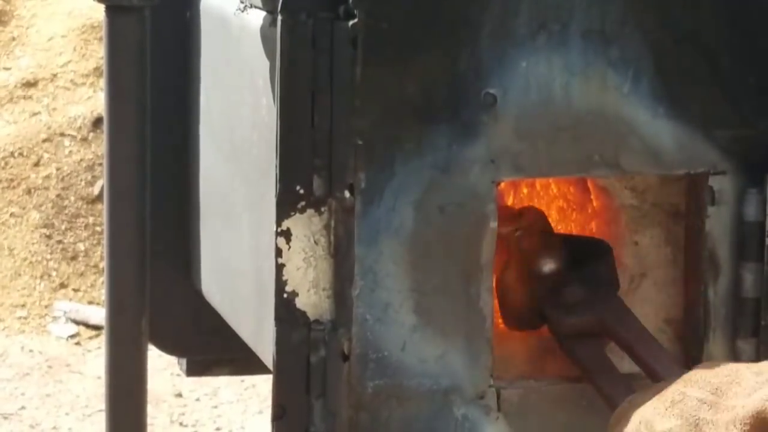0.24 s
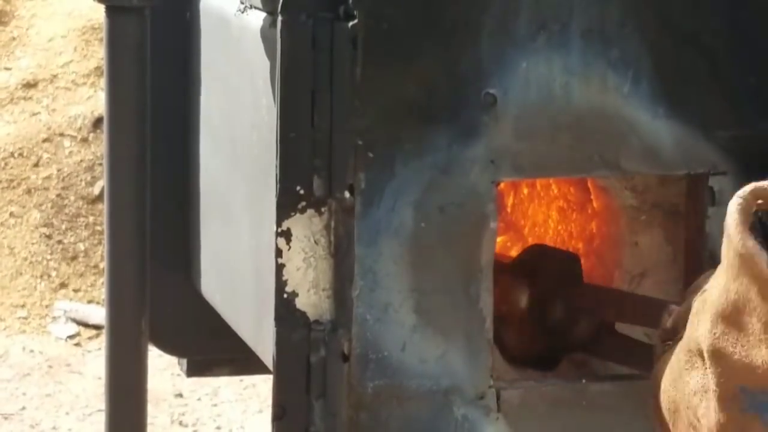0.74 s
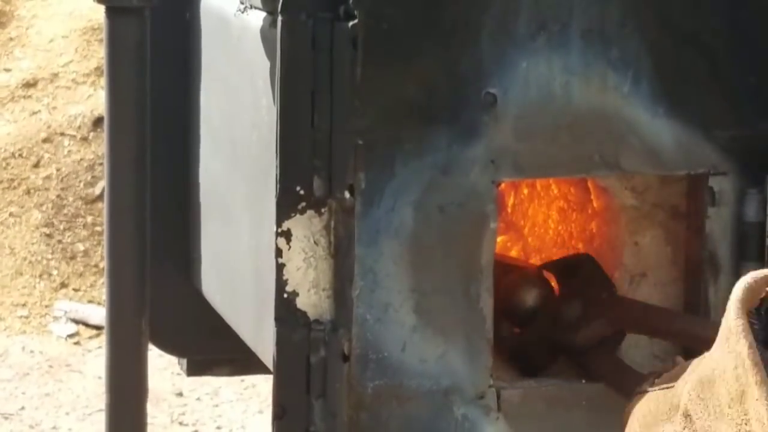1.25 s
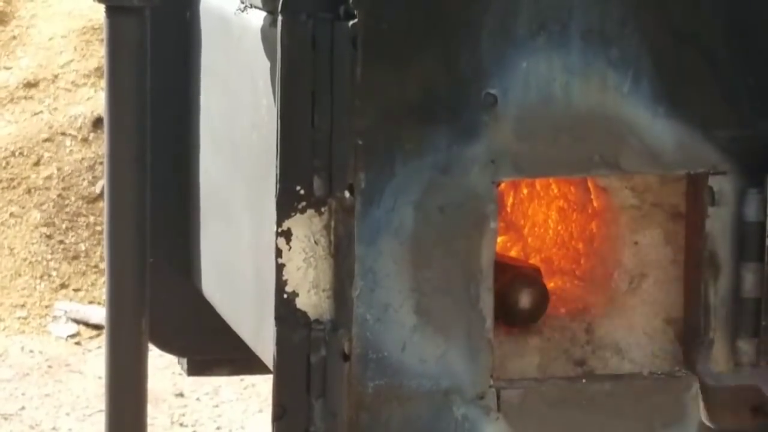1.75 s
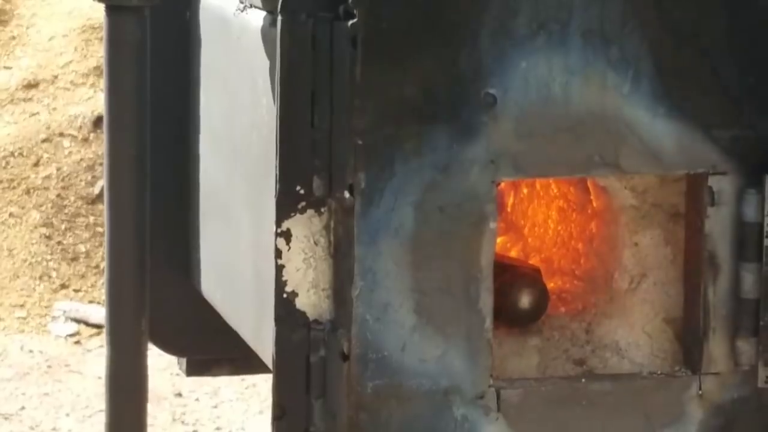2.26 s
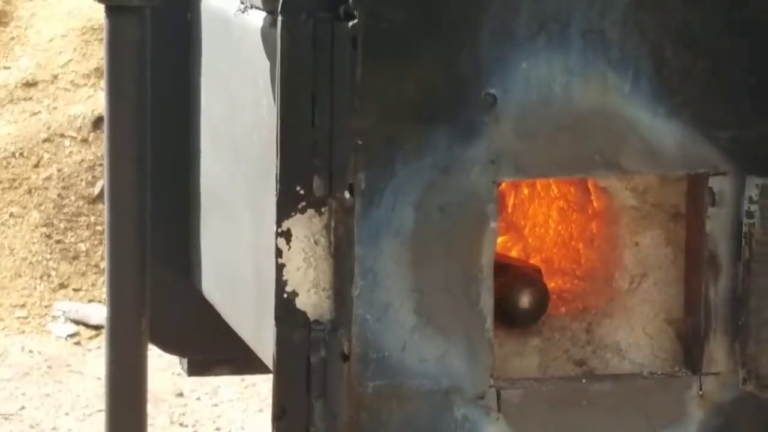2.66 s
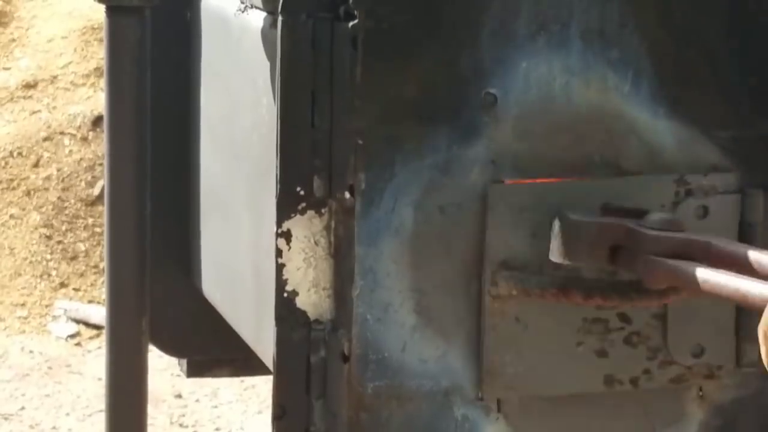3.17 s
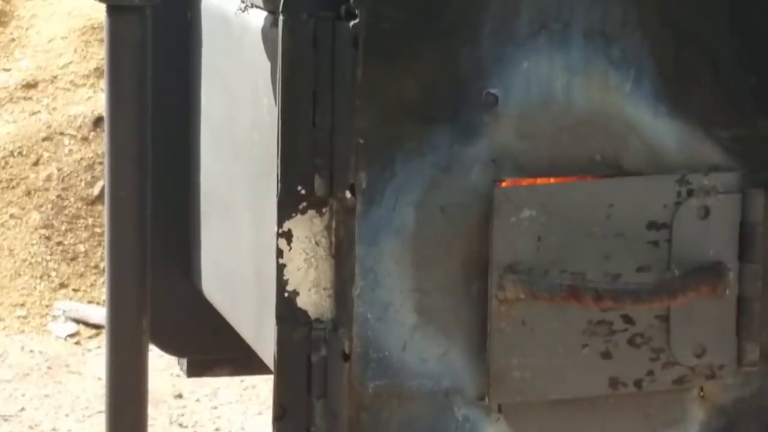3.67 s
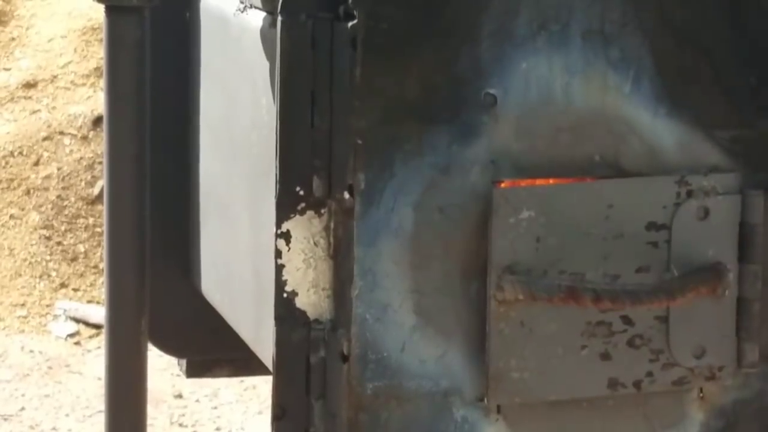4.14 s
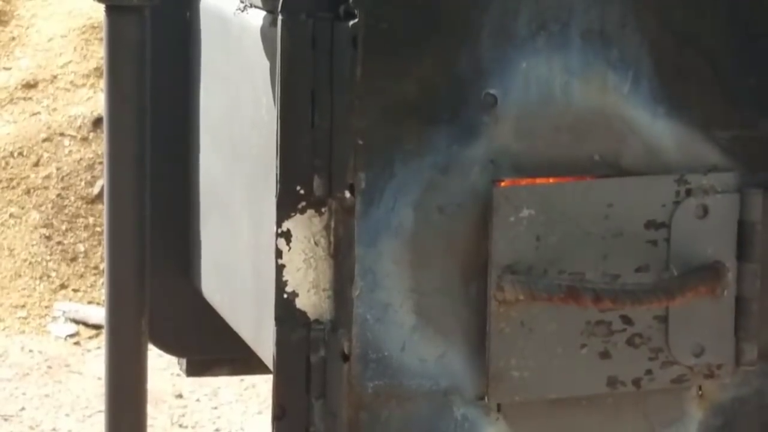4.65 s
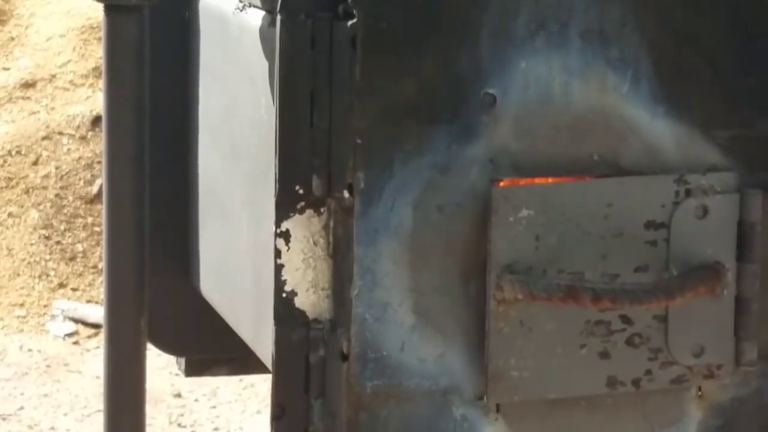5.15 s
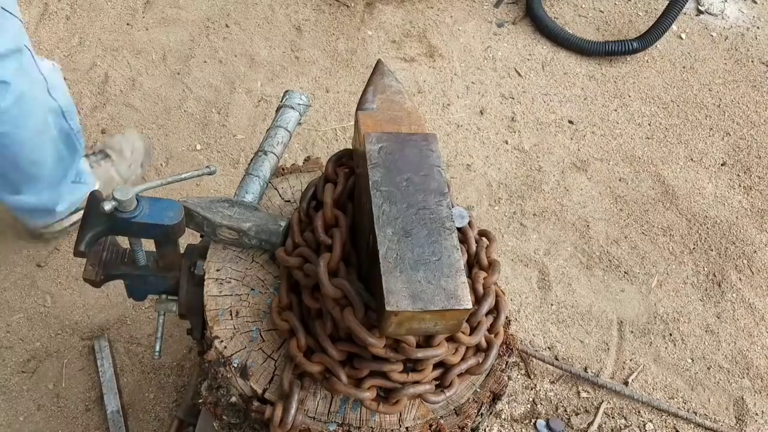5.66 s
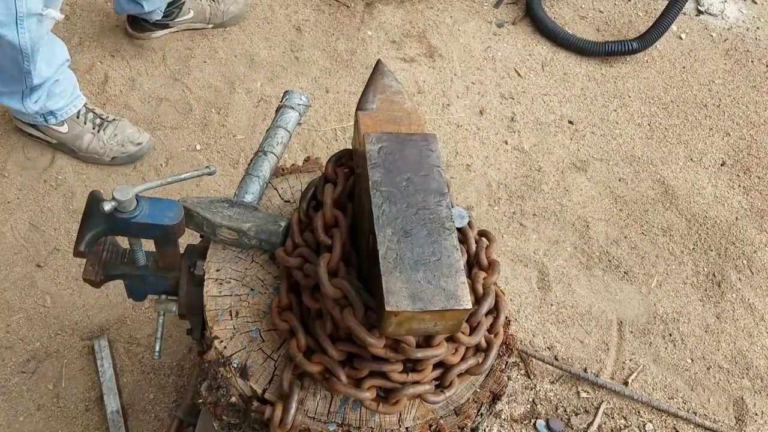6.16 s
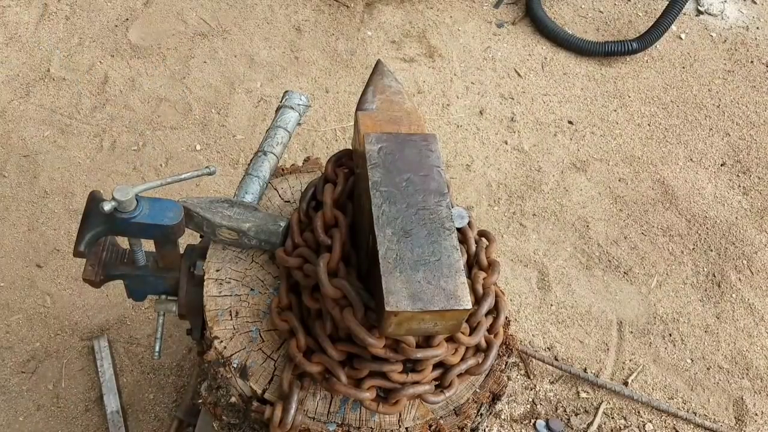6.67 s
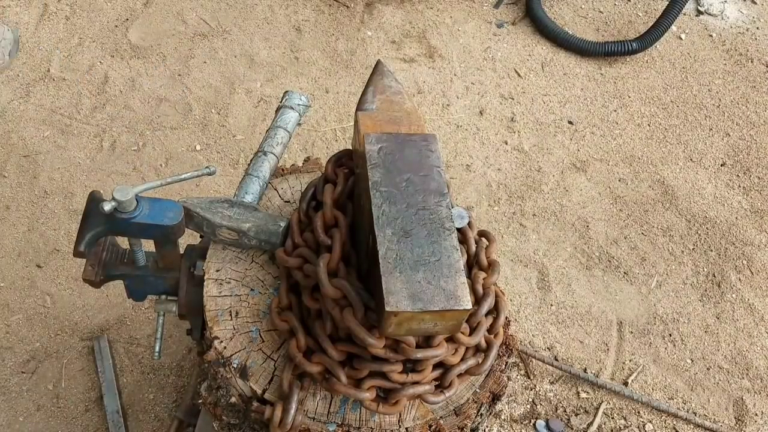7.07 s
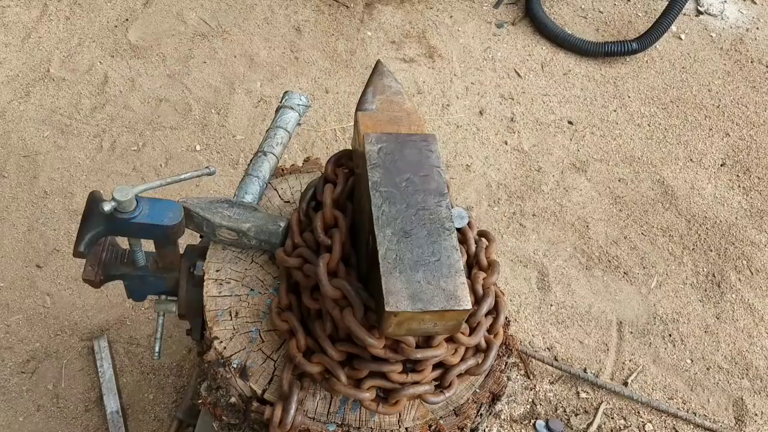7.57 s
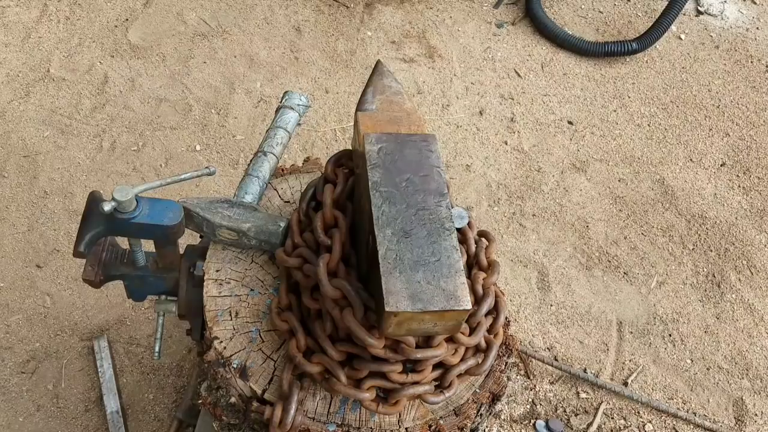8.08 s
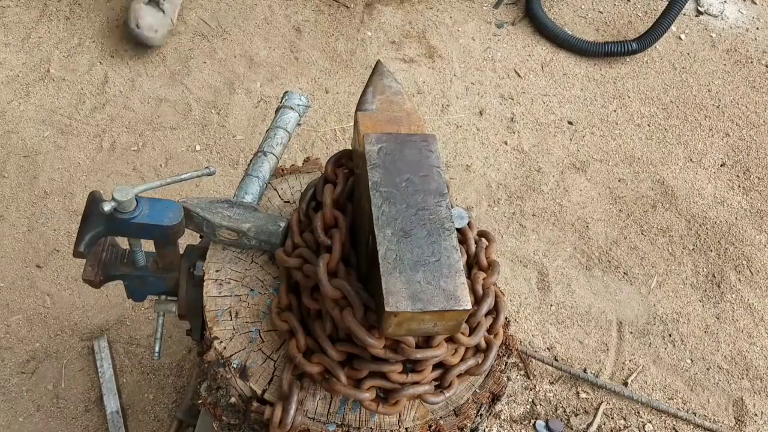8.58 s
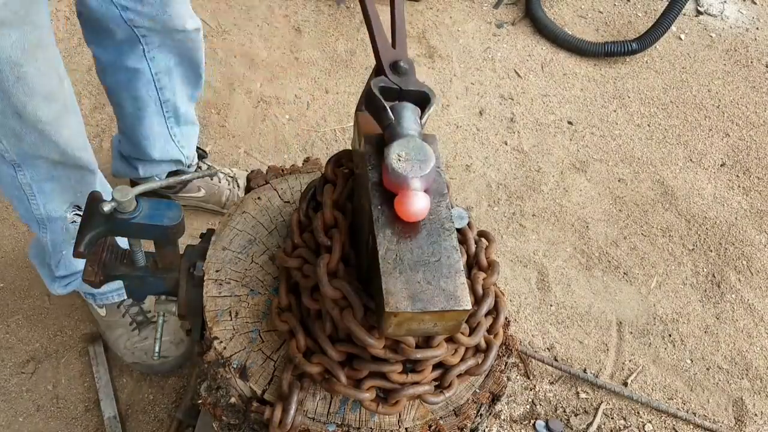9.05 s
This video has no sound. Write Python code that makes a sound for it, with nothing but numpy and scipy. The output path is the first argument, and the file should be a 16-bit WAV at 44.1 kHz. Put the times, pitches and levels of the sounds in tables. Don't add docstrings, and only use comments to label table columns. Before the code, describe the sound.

Loud forge fire roar with rushing blower air and motor whine, a brief dropout, then a thinner fan rush, metal ticks and one hammer blow.

```python
import sys
import numpy as np
from scipy import signal
from scipy.io import wavfile
from scipy.ndimage import uniform_filter1d

SR = 44100
rng = np.random.default_rng(int(sys.argv[2]) if len(sys.argv) > 2 else 0)


def generate_wav(sig):
    pcm = np.round(np.clip(np.atleast_2d(sig).T, -1, 1) * 32767).astype(np.int16)
    wavfile.write(sys.argv[1], SR, pcm)


def level_to_linear(level):
    exponent = np.asarray(level, float) / 20
    return 10 ** exponent


N = 411012


def evened(x):
    return x / np.sqrt(np.mean(x ** 2) + 1e-20)


def read(points, hz):
    f, *columns = np.transpose(points)
    return [np.interp(np.log(hz + 1), np.log(f + 1), c) for c in columns]


def curves(rows):
    s, *columns = np.transpose(rows)
    return [np.interp(np.arange(N) / SR, s, c) for c in columns]


def wander(per_s):
    t = np.arange(0, N + 64, 64) / SR
    hz = np.geomspace(per_s / 8, per_s, 24)
    slow = np.sin(2 * np.pi * (hz * t[:, None] + rng.random(24))) @ hz ** -.5
    return np.interp(np.arange(N) / SR, t, evened(slow))


def ports_at(ports, hz):
    table, opposed_hz, steepness = ports
    same, balance_db = read(table, hz)
    lead_rad = -np.pi * (hz / opposed_hz) ** steepness
    return same, lead_rad, balance_db


def turbulence(spectrum, modes, ports, patchy_db):
    frames, hz = N // 512 + 5, np.fft.rfftfreq(2048, 1 / SR)[:, None]
    a, b, c, d, patches = rng.standard_normal((frames, 1025, 5)).T
    patches = uniform_filter1d(patches, size=24, axis=0)
    patches = evened(uniform_filter1d(patches, size=10, axis=1))
    same, lead_rad, balance_db = ports_at(ports, hz)
    same = np.clip(same, 0, 1)
    left = a + 1j * b
    right = same * left * np.exp(-1j * lead_rad) + np.sqrt(1 - same ** 2) * (c + 1j * d)
    colour_db = read(spectrum, hz)[0]
    for mode_hz, width_hz, mode_db in modes:
        colour_db = colour_db + mode_db / (1 + (2 * (hz - mode_hz) / width_hz) ** 2)
    z = np.array([left * level_to_linear(balance_db / 2), right / level_to_linear(balance_db / 2)])
    z *= (hz >= spectrum[0][0]) * level_to_linear(colour_db + patchy_db * patches)
    return evened(signal.istft(z, nperseg=2048, noverlap=1536)[1][:, :N])


# (time [s], level [dB])
DRAUGHT = [(0, -.5), (1.5, -0.2), (1.85, -1.5), (2.05, -3), (2.3, 0), (2.7, .5), (3.7, -0.5), (4.6, 0),
           (4.78, .5), (4.87, 2.5), (4.95, 2.5)]
AWAY_DB_PER_S = -12, -5, -12, 10.5, -10
FLAME_DB, AIR_DB, MOUTH_DB, LEAK_DB = -13, -24.5, -30, -31
TURN_S, SHADE_S, LEAK_LEAD_S = 4.885, .02, .08
SHADE_DB, RUSH_SHADE_DB, LEAK_ONSET_DB = -14, -2, -22


def door_levels():
    t = np.arange(N) / SR - TURN_S
    flame, rush, mouth, leak, tones_db = np.outer(AWAY_DB_PER_S, np.maximum(t, 0))
    shade = np.clip(t / SHADE_S + .5, 0, 1)
    draught_db = curves(DRAUGHT)[0]
    flame_db = FLAME_DB + flame
    air_db = AIR_DB + draught_db + RUSH_SHADE_DB * shade + rush
    mouth_db = MOUTH_DB + 0.53 * draught_db + SHADE_DB * shade + mouth
    leak_db = LEAK_DB + LEAK_ONSET_DB * np.clip(-t / LEAK_LEAD_S, 0, 1) + leak
    return flame_db, air_db, mouth_db, leak_db, tones_db


# (frequency [Hz], likeness [0-1], left minus right [dB]),
# then pitch of opposite phase [Hz], steepness
DOOR_PORTS = [(40, 1, -1.1), (300, 0.98, -1.9), (796, 0.9, -1.5), (1700, 0.43, -.5), (2360, 0.99, 0),
              (4770, 0.38, -2.2), (8500, .1, 2), (11000, 0.16, -1)], 12000, 4.8
# (frequency [Hz], density [dB per Hz])
FLAME = [(15, -59), (25, -44), (73, -12.5), (113, -12.5), (244, 0), (335, -4), (399, -11), (448, -5.5),
         (599, -18), (672, -17.5), (800, -24), (1040, -62), (1760, -120)]
# (frequency [Hz], width [Hz], level [dB])
CHAMBER = [(86, 19, 5), (157.4, 27, 5.5), (239.4, 20, 4.5), (445, 64, 5), (537, 23, 7.5), (535, 25, -3)]


def flame_roar(level_db):
    throb_db = .3 * wander(30)
    flame = level_to_linear(level_db + throb_db) * turbulence(FLAME, CHAMBER, DOOR_PORTS, patchy_db=-0.74)
    return 1.2 * np.tanh(flame / 1.2)


# (frequency [Hz], density [dB per Hz])
AIR = [(410, 1), (700, -9), (940, -9), (975, -6), (1280, -4.5), (1630, -5.5), (1920, -9), (2170, -10),
       (2580, -5.5), (8480, -21), (13200, -24)]
# (frequency [Hz], width [Hz], level [dB])
PIPE = [(880, 130, 6), (1357, 240, 5), (1880, 106, 5), (1990, 60, 2), (3410, 1200, -5.5), (11940, 2200, 9)]


def pipe_air(level_db):
    return level_to_linear(level_db) * turbulence(AIR, PIPE, DOOR_PORTS, patchy_db=1.5)


# (frequency [Hz], density [dB per Hz])
MOUTH = [(1500, -27), (2000, -3), (2500, -8), (3400, -2.5), (4200, -5.5), (6000, -9.5), (8000, -11.5),
         (10000, -38)]
# (frequency [Hz], width [Hz], level [dB])
LIP = [(2560, 150, 4), (3110, 130, 5), (3390, 100, 4.5), (3870, 69, 1)]


def mouth_hiss(level_db):
    return level_to_linear(level_db) * turbulence(MOUTH, LIP, DOOR_PORTS, patchy_db=0.95)


# (time [s], speed [turns/s])
SHAFT = [
    (0, 331.8),
    (5.4, 331.8),
    (5.44, 329.55),
    (7.2, 329.42),
    (7.7, 329.15),
    (8.4, 329.1),
    (9.32, 328.95),
]
SHUT_S, SHUT_DB = 3.2, 3.5


def motor(orders, levels_db, ports, waver_db):
    turns = np.cumsum(curves(SHAFT)[0] * (1 + .0004 * wander(6))) / SR
    shut_db = SHUT_DB * np.clip(np.arange(N) / SR - SHUT_S, 0, 1)
    out = np.zeros((2, N))
    for order, db in zip(orders, levels_db):
        _, lead_rad, balance_db = ports_at(ports, order * SHAFT[0][1])
        phase = 2 * np.pi * (order * turns + rng.random()) + np.array([[lead_rad], [0]])
        strength = level_to_linear(db + waver_db * np.sqrt(order) * wander(10) + shut_db * (order == 2))
        balance = level_to_linear(np.array([[.5], [-.5]]) * balance_db)
        out += strength * np.sqrt(2) * np.sin(phase) * balance
    return out


# (frequency [Hz], density [dB per Hz])
JET = [(3500, -8), (5000, -6), (7000, -10), (9000, -18), (10700, -4), (12600, -4), (13200, -6.5)]
LEAK_PORTS = [(100, .1, -11), (20000, .1, -25)], 13000, 3.0


def leak_hiss(level_db):
    return level_to_linear(level_db) * turbulence(JET, [], LEAK_PORTS, patchy_db=-0.5)


DOOR_ORDERS = [1, 2, 3, 3.638, 3.73, 4, 4.36, 5, 6, 10, 12]
DOOR_TONES_DB = [-28, -37.5, -40, -45.5, -55, -34.5, -52, -48, -46, -48, -58]


def fire_door():
    flame_db, air_db, mouth_db, leak_db, tones_db = door_levels()
    gusts_db = 0.37 * wander(14)
    air = pipe_air(air_db + gusts_db) + mouth_hiss(mouth_db + gusts_db)
    tones = level_to_linear(tones_db) * motor(DOOR_ORDERS, DOOR_TONES_DB, DOOR_PORTS, waver_db=.9)
    return flame_roar(flame_db) + air + tones + leak_hiss(leak_db)


LEAVE_S, ARRIVE_S = 5.3855, 5.4497


def scene_change():
    t = np.arange(N) / SR
    leaving = level_to_linear(-18 - 1800 * np.maximum(t - LEAVE_S, 0))
    arriving = level_to_linear(-26 - 5000 * np.maximum(ARRIVE_S - t, 0)) * (t > ARRIVE_S - .0045)
    return np.where((t < LEAVE_S) | (t > ARRIVE_S), 1, leaving + arriving)


ANVIL_PORTS = [(70, 0.19, -.3), (200, 0.88, -.8), (427, 0.99, -1.3), (1200, 0.96, -1.6),
               (3400, 0.91, -0.91), (4800, 0.35, -.5), (7500, .2, -1.6), (12500, 0.28, -1.7)], 10600, 1.9
# (frequency [Hz], density [dB per Hz])
DRONE = [(12, -67), (20, -39), (80, -21.5), (103, -41), (124, -17.5), (157, -21.5), (309, -4.5),
         (362, -8.5), (385, -5.5), (458, -1.5), (528, -2), (580, -21), (638, -0.5), (735, -12), (860, -10),
         (1120, -18), (1890, -120)]
# (frequency [Hz], density [dB per Hz])
RUSH = [(470, -39), (800, -51), (932, -11), (1040, -8.5), (1290, -6), (1400, -8), (1780, -7.5), (2070, -19),
        (2710, -19), (3270, -25), (3850, -22.5), (5410, -21), (6160, -24), (11900, -24), (13200, -26.5)]
# (frequency [Hz], width [Hz], level [dB])
HOUSING = [(924, 31, 9), (1170, 83, 5), (1496, 280, 6.5), (1800, 26, 4), (2240, 120, 2.5), (5330, 120, 3.5)]
ANVIL_ORDERS = [4, 8, 9.45, 10.34, 10.54, 12, 13.45, 13.82, 20]
ANVIL_TONES_DB = [-26.3, -38.3, -54, -57, -53, -43.5, -53, -54, -45]
DRONE_DB, RUSH_DB = -25.7, -17.5


def blower():
    gusts_db = .45 * wander(18)
    drone = level_to_linear(DRONE_DB + gusts_db) * turbulence(DRONE, [], ANVIL_PORTS, patchy_db=0.65)
    rush = level_to_linear(RUSH_DB + gusts_db) * turbulence(RUSH, HOUSING, ANVIL_PORTS, patchy_db=0.3)
    return drone + rush + motor(ANVIL_ORDERS, ANVIL_TONES_DB, ANVIL_PORTS, waver_db=.5)


# (time [s], frequency [Hz])
HUM = [
    (5.4, 138),
    (7.0, 137),
    (7.5, 128),
    (9.32, 127),
]
HUM_DB = -53.5


def far_hum():
    phase = 2 * np.pi * np.cumsum(curves(HUM)[0]) / SR
    return level_to_linear(HUM_DB + 2.1 * wander(5)) * np.sqrt(2) * np.sin(phase)


# (time [s], peak [dB], weight of low modes [dB], pitch factor [1])
HITS = [
    (8.833, -13, -20, 1.3),
    (9.0660, -4, -20, .98),
    (9.0775, -15, -10, .9),
    (9.1952, 5.5, -2, 1),
    (9.1998, -11, -20, 1.65),
]
# (frequency [Hz], level [dB], t60 [s])
STEEL = [(820, -4, .03), (1620, -7, .025), (2150, -3, .018), (3060, 0, .013), (3820, -1, .007),
         (4250, -1, .008), (4850, -10, .008), (6050, -9, .007), (6700, -7, .011), (7350, -8, .008),
         (8400, -8, .005), (9400, -11, .005), (10700, -7, .003), (12400, -11, .003)]
RISE_CYCLES = .5


def steel():
    out, t = np.zeros((2, N)), np.arange(1000) / SR
    for s, peak_db, low_db, pitch in HITS:
        ring = np.zeros(1000)
        for hz, db, t60_s in STEEL:
            decay = level_to_linear(db + low_db * (hz < 2500) - 60 * t / t60_s)
            rise = 1 - np.exp(-t * hz / RISE_CYCLES)
            ring += decay * rise * np.sin(2 * np.pi * hz * pitch * t)
        at = round(s * SR)
        out[:, at:at + 1000] += ring * level_to_linear(peak_db) / abs(ring).max()
    return out * level_to_linear(np.array([[-.6], [.6]]))


def scene():
    first = np.arange(N) / SR < (LEAVE_S + ARRIVE_S) / 2
    return np.where(first, fire_door(), blower() + far_hum() + steel())


STARVED_HZ, STARVED_SPREAD_HZ = 8900, 1500


def treble_holes(x, depth_db):
    hz, _, z = signal.stft(x, SR, nperseg=1024, noverlap=768)
    hz = hz[:, None]
    chance = uniform_filter1d(rng.standard_normal(z.shape[1:]), size=5, axis=0)
    chance = evened(uniform_filter1d(chance, size=9, axis=1))
    chance += 0.4 * np.exp(-((hz - STARVED_HZ) / STARVED_SPREAD_HZ) ** 2)
    empty = np.clip(4 * (chance - 1.75), 0, 1) * np.clip(hz / 3000 - 1, 0, 1)
    return signal.istft(z / level_to_linear(depth_db * empty), SR, nperseg=1024, noverlap=768)[1][:, :N]


def gain_cut_db(dry):
    sharp = np.diff(dry, prepend=0)
    power_db = 10 * np.log10(signal.lfilter([.01], [1, -.99], (sharp ** 2).mean(0)) + 1e-12)
    fall_db = np.arange(N) * 8. / SR
    over_db = np.maximum(np.maximum.accumulate(power_db + fall_db) - fall_db + 19., 0)
    over_db = np.roll(over_db, round(.0028 * SR)) * (fall_db > 1)
    quick, slow = np.exp(-1 / (.001 * SR)), np.exp(-1 / (.025 * SR))
    cut_db = 0.9 * signal.lfilter([1 - quick], [1, -quick], over_db)
    return cut_db + 0.54 * signal.lfilter([1 - slow], [1, -slow], over_db)


def band_limit(x):
    return signal.sosfilt(signal.butter(12, 14400, fs=SR, output="sos"), x)


def record(dry):
    ducked = np.clip(dry / level_to_linear(gain_cut_db(dry)), -1, 1)
    holed = treble_holes(ducked, depth_db=47.0)
    edge = signal.firwin(801, 13190, window=("kaiser", 8), fs=SR)
    limited = signal.oaconvolve(holed, edge[None], "same")
    mix = np.clip(limited, -1, 1) * scene_change() - .0004
    return band_limit(mix)


dry = scene()
out = record(dry)
generate_wav(out)
```